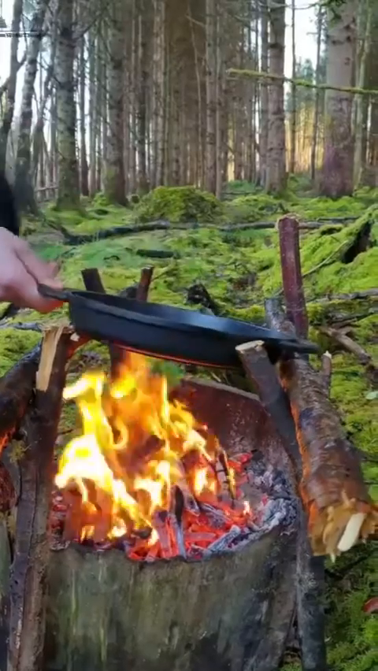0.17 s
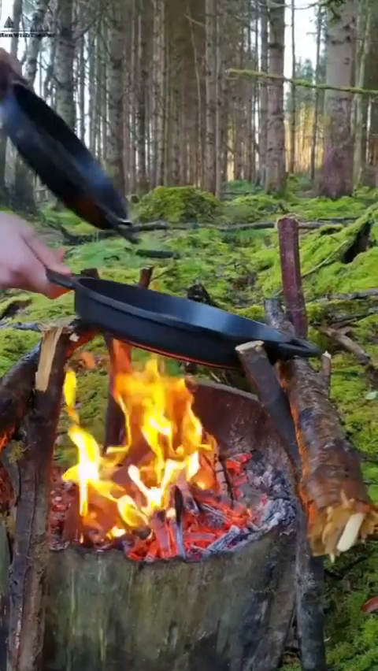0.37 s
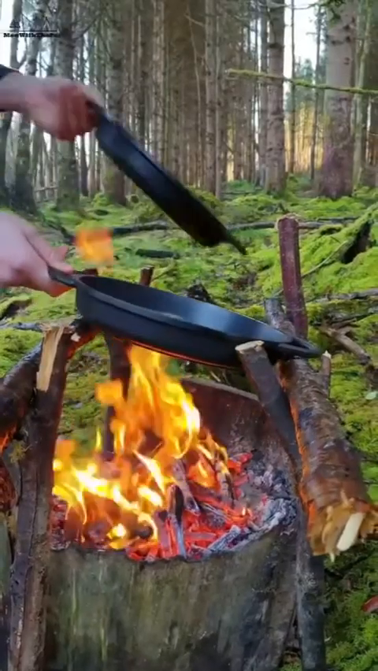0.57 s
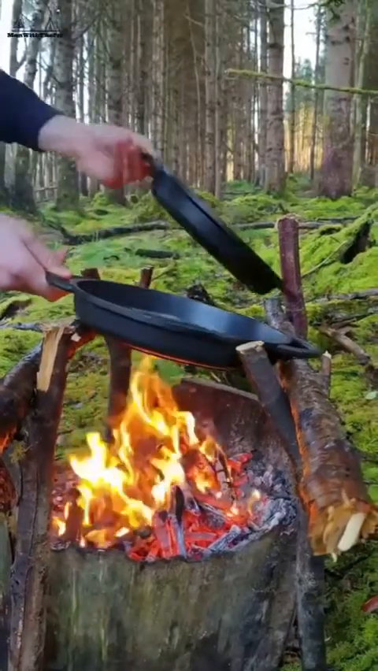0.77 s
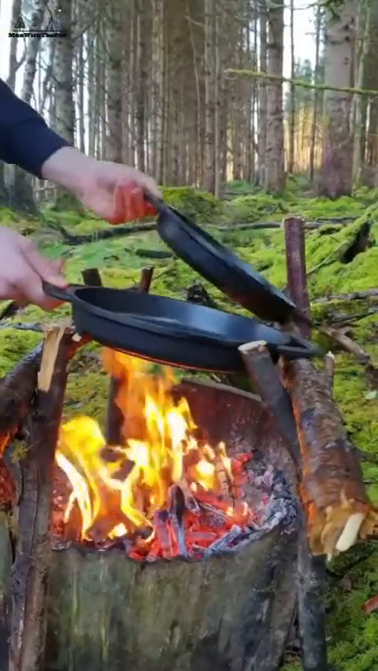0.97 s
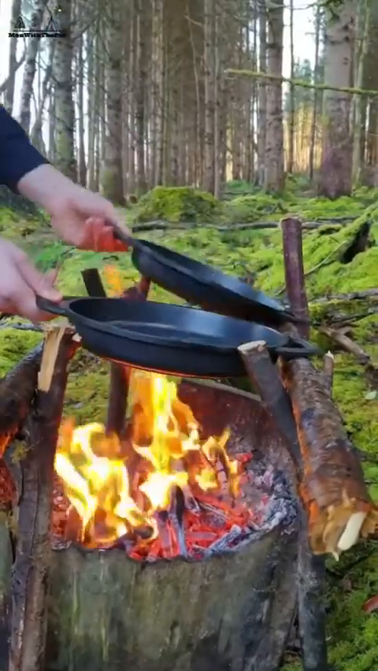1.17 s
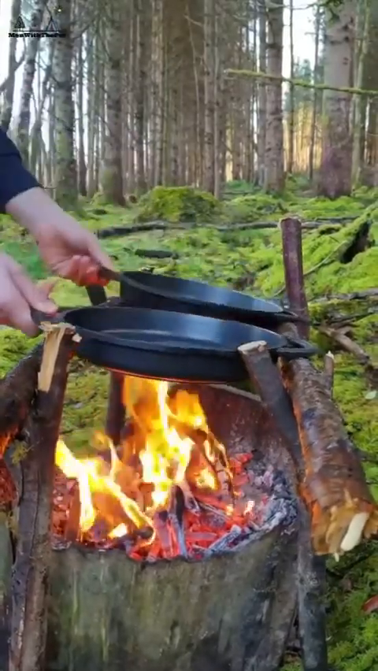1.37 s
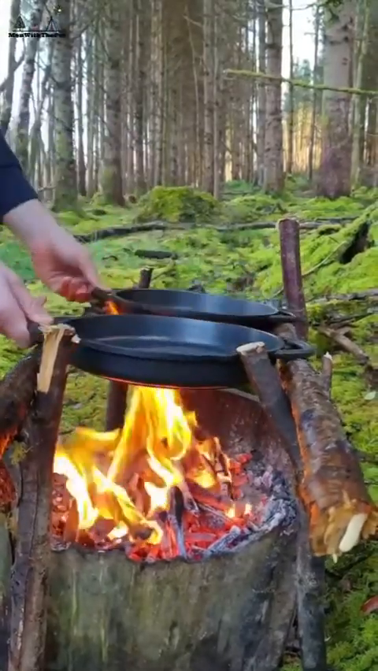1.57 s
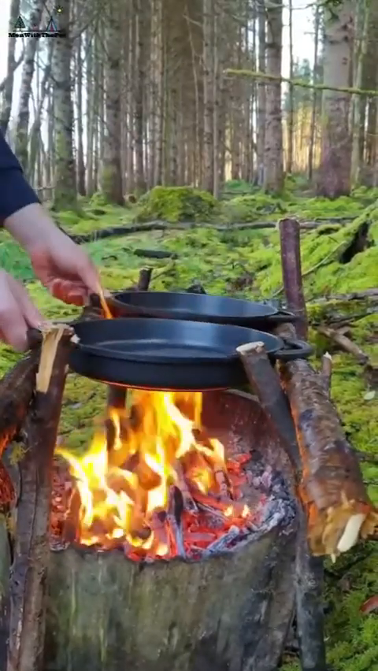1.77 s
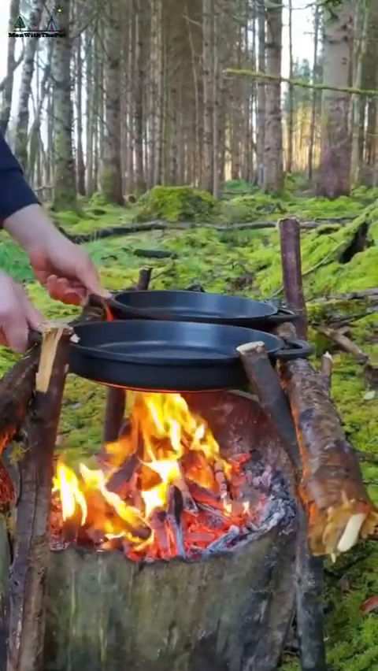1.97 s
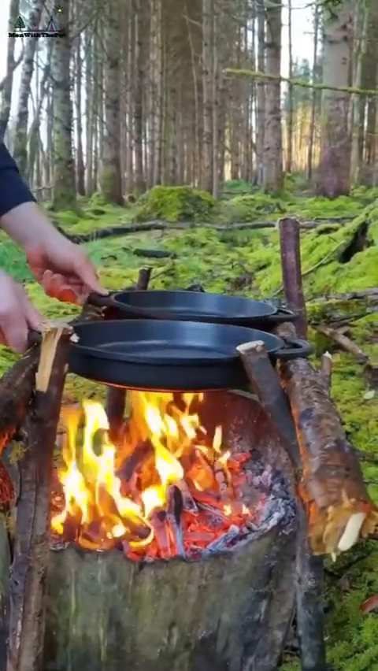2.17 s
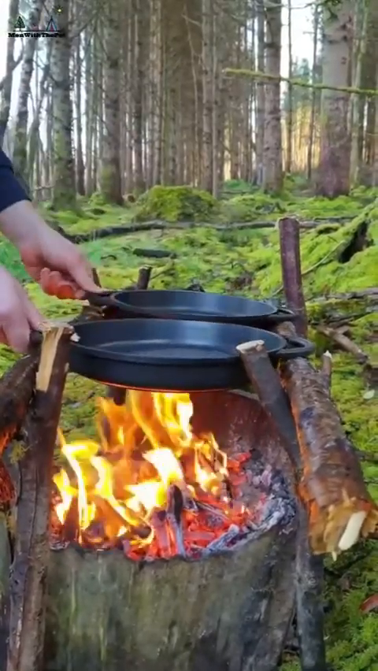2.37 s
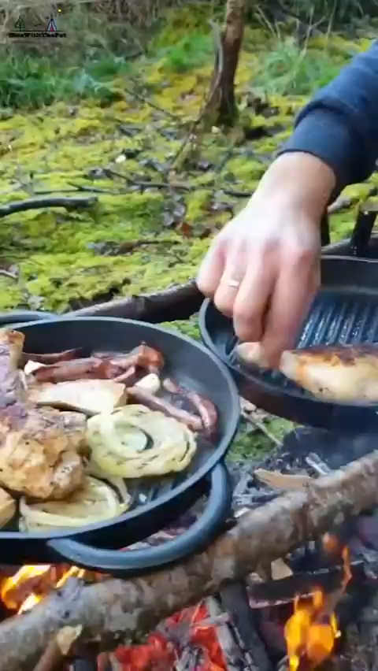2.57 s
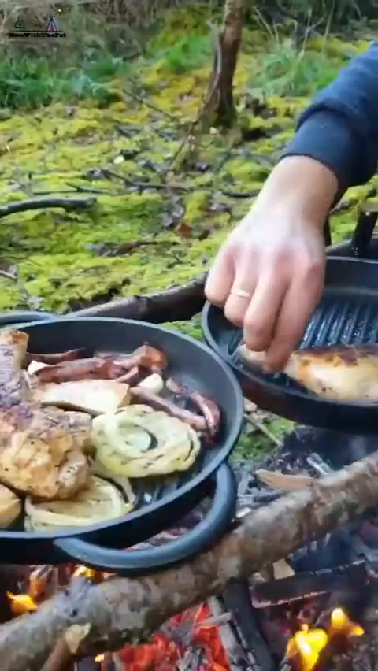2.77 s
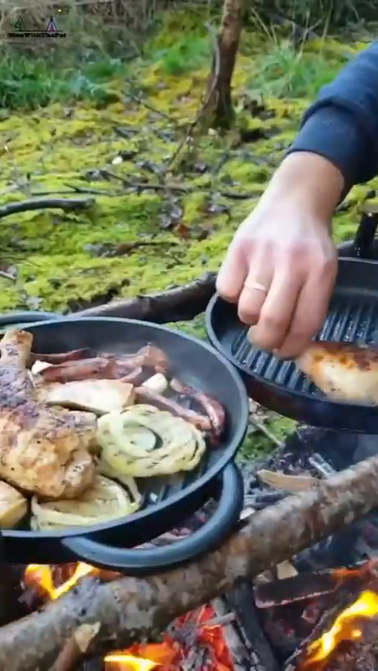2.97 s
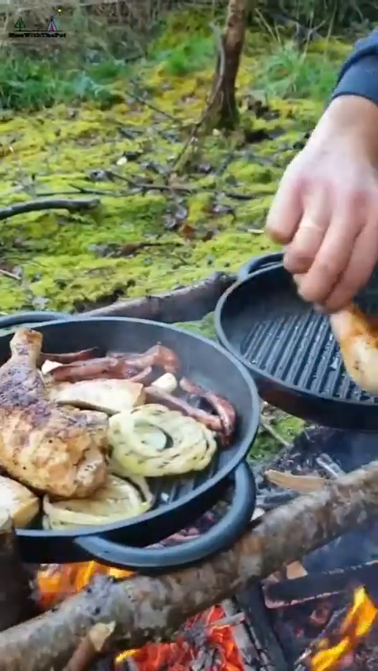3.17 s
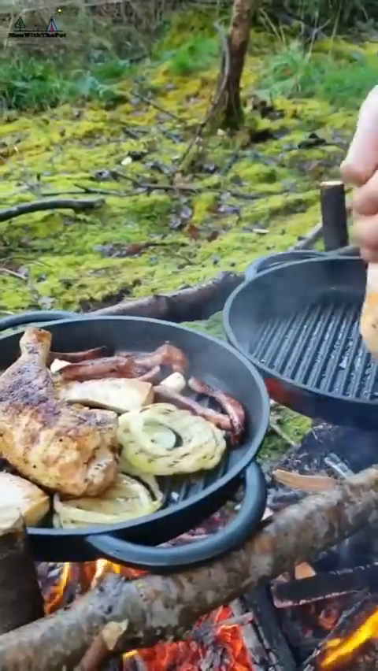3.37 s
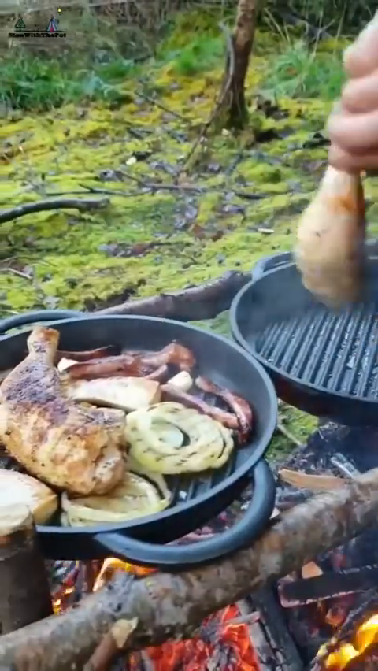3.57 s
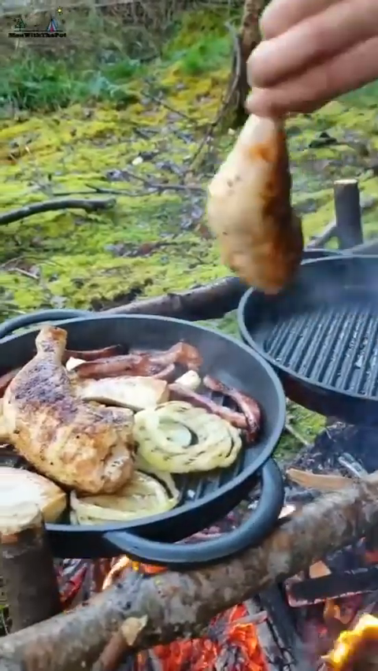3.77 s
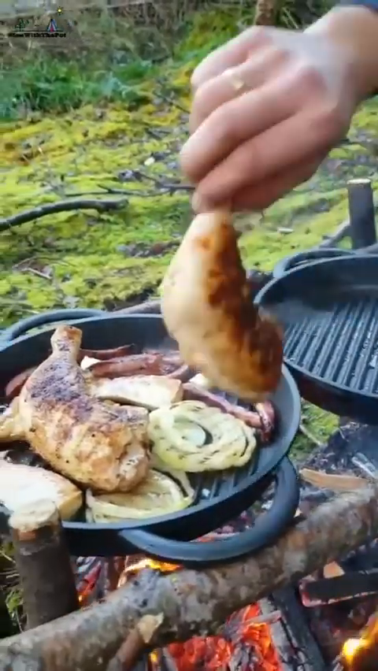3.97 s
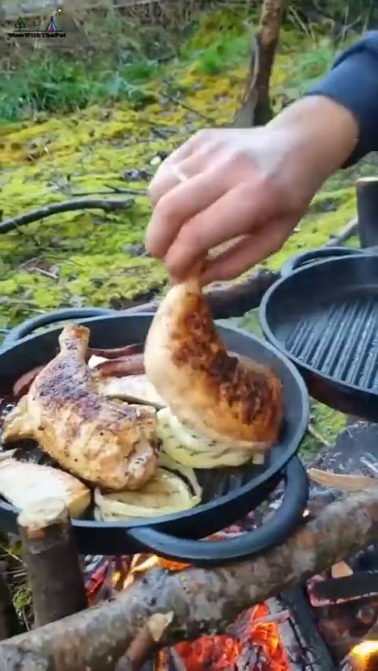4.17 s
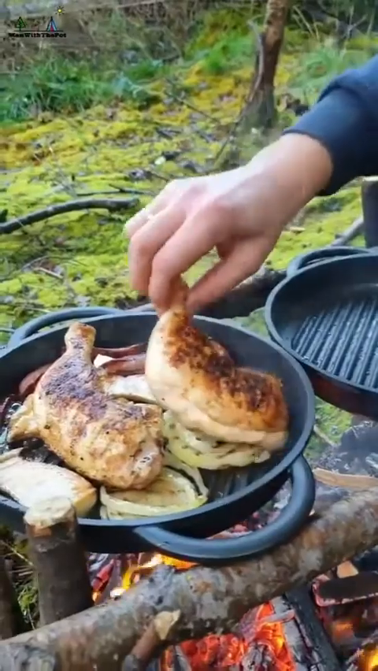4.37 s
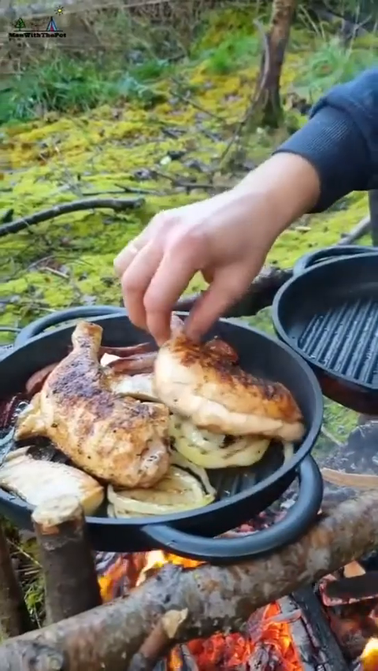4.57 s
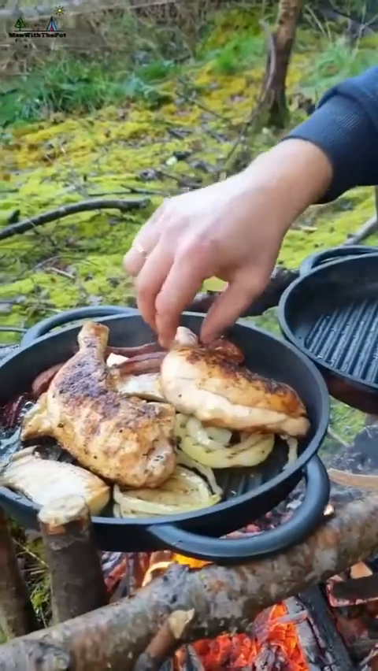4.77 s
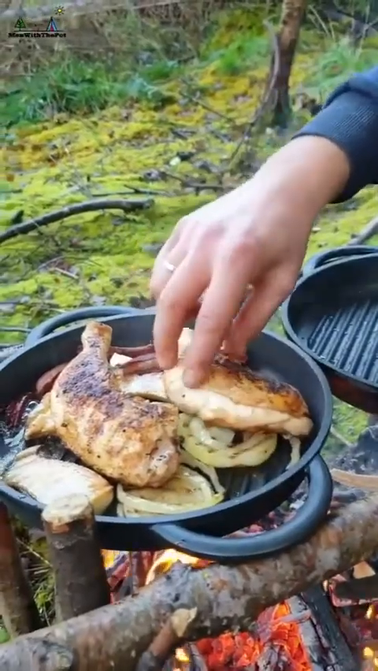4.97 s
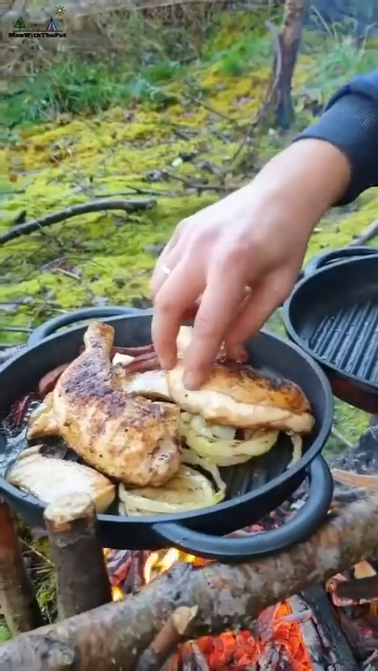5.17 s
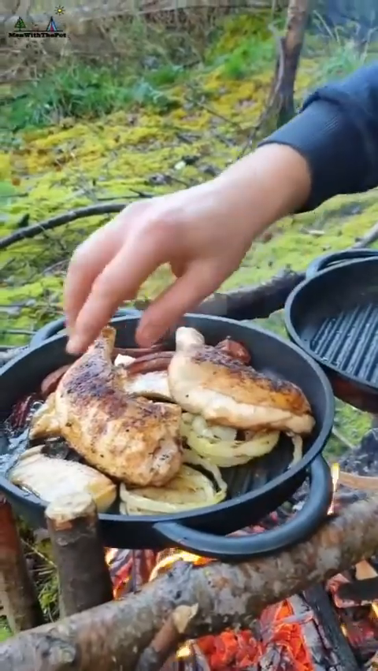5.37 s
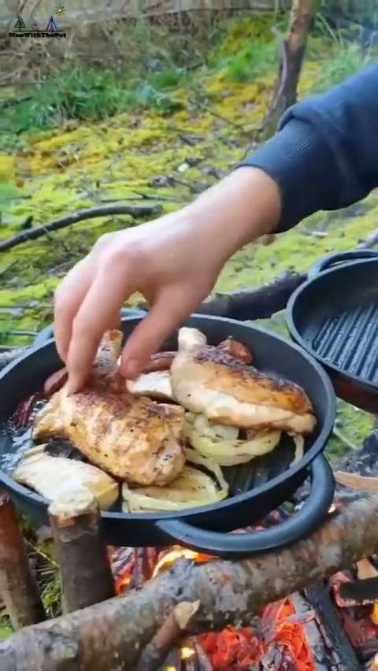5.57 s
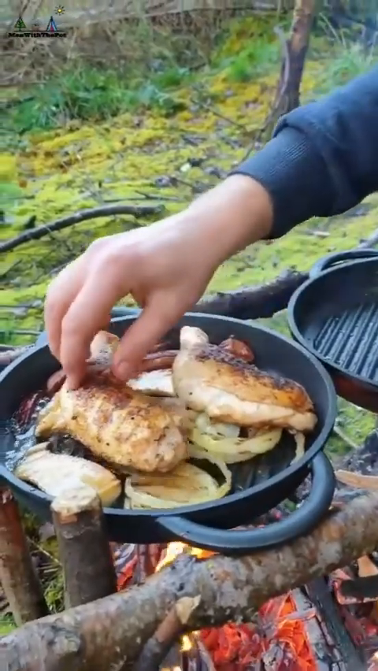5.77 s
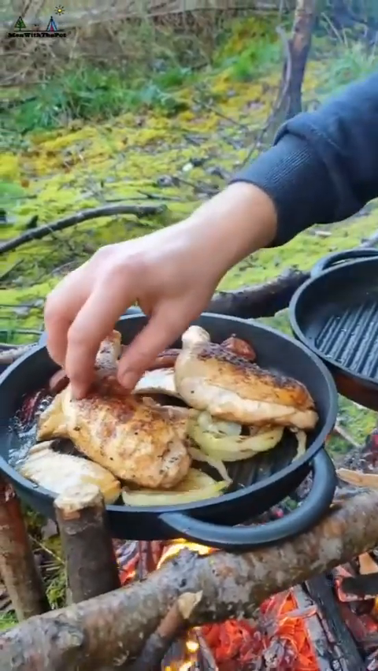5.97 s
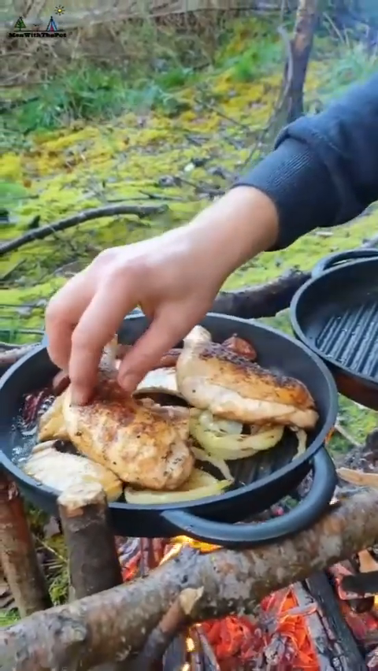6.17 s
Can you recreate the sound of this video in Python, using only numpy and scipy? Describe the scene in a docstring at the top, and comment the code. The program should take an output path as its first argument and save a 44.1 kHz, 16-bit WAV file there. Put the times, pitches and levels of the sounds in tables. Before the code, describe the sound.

Cast-iron pans clank and scrape onto a log rack over a soft wood fire, then chicken sizzles loudly in hot fat up close.

```python
"""Chicken sizzles close up in hot fat: noise puffs for bursting droplets, decaying sines for bubbles and pops,
filtered noise snaps for spits, short hisses and whistles of steam; it swells as meat is laid in and pressed down.
Before that, two cast-iron pans are set on a rack of logs over a wood fire in a forest. Blows and rubs ring
their modes over a noisy thud, the wood snaps, and trunks answer with a faint tail.
The fire goes on throughout: a fluttering low rumble, a soft rush and low sine puffs."""
import sys
import numpy as np
from scipy import signal
from scipy.fft import rfft, irfft, next_fast_len
from scipy.io import wavfile

SR = 44100
rng = np.random.default_rng(int(sys.argv[2]) if len(sys.argv) > 2 else 0)


def digitize_waveform(pressure):
    """Quantize a signal to 16-bit integers and store it at the path in sys.argv[1].

    Rows of a 2-D input are taken as channels; values are limited to [-1, 1].
    """
    field = np.atleast_2d(pressure).T
    bounded = np.clip(field, -1, 1)
    quanta = np.round(bounded * 32767).astype(np.int16)
    wavfile.write(sys.argv[1], SR, quanta)


N = 274285
TIME = np.arange(N) / SR
SIDES = np.array([[1], [-1]])   # left, right
CLOSE_UP_S = 2.795   # from here on the pan is heard from close by
CUTOFF_HZ = 11800   # top of the whole sound
FIRE_WIDE_DB, FIRE_CLOSE_DB = -59.5, -62.5   # rumble drive facing the flames, and from above the pan
FOREST_T60_S, FOREST_PANS_DB, FOREST_WOOD_DB = 0.33, -14.5, -16.5   # tail decay and sends
# the log rack takes the weight of the rear pan
RACK_S, RACK_DB, RACK_HZ, RACK_T60_S = 1.051, -38, 142, 0.07
PLOP_CYCLES, BUBBLE_CYCLES, FIZZ_CYCLES, TICK_CYCLES = 8, 40, 70, 31   # cycles to fall 60 dB
BURST_S, BUBBLE_SPREAD_DB = .0018, 3.0   # decay constant of steam power; inequality of small bubbles
SPIT_T60_S, SPIT_WIDTH = 0.0064, 1.58   # band corners lie this factor below and above the centre
SPATTER_PER_S, SPATTER_DB, SPATTER_SPREAD_DB = 30, -0.5, 3   # lesser spits, level relative to the boil

# stereo likeness of left and right: (frequency [Hz], correlation [-1 to 1])
LIKENESS = [(40, 0.6), (130, 0.9), (230, 0.7), (450, 0.53), (700, 0.8), (1500, .5), (2200, 1), (3500, 0.77),
            (4500, 0.17), (8000, 0), (11000, -0.02)]
# stereo tilt: (frequency [Hz], left over right [dB])
BALANCE = [(50, 0.5), (170, -1), (350, 6.5), (1100, 6), (2100, 1), (3700, -2.5), (5200, 12), (6800, 9),
           (9000, 5.5), (11500, 0.5)]
# colour of the fire: (frequency [Hz], density [dB per Hz])
FIRE_COLOUR = [(20, -26.5), (40, -3), (65, 4), (130, -3.5), (240, -19.5), (420, -17), (600, -22),
               (820, -23.5), (1100, -33), (3000, -38.5), (7300, -47), (10500, -38.5)]
# puffs of flame: (time [s], level before panning [dB], pitch [Hz])
PUFFS = [(0.683, -44.5, 56.3), (1.756, -36.5, 73.3), (2.141, -41, 57.5), (5.006, -37, 67.2)]
# snaps of burning wood: (time [s], level [dB])
SNAPS = [(0.375, -45), (0.7172, -38.5), (1.133, -47), (1.316, -46), (2.289, -30.5)]
# colour of a wood snap: (frequency [Hz], density [dB per Hz])
SNAP_COLOUR = [(200, -28), (700, 1.5), (1400, 4), (3000, 0.5), (6000, -7), (9000, 2), (12000, -2.5)]
# pan modes: (frequency [Hz], level [dB], t60 [s])
FRONT_PAN = [(828, -2, .14), (884, -6, .11), (1733, -3, .16), (1825, -5, .11), (2013, 0, .16),
             (2548, -24, .33), (3036, -21, .21), (926, -16, .1), (1322, -17, .11), (1907, -14, .16),
             (2068, -12, .16), (3418, -20, .12), (4420, -20, .06), (4510, -24, .05), (4867, -28, .11),
             (5140, -25, .05), (6008, -21, .06), (6120, -23, .05), (6218, -24, .08), (7251, -24, .08),
             (7480, -20, .055), (8193, -26, .1), (8850, -25, .07), (9372, -27, .09), (10200, -25, .06),
             (10800, -23, .06)]
REAR_PAN = [(1410, -7, 0.16), (1450, -11, .12), (1693, -4.5, .125), (1765, -3.5, .12), (1790, -8, .14),
            (1911, -6.5, .13), (2065, -7.5, .13), (2095, -5, .11), (2541, -4.5, .26), (2240, -1.5, .03),
            (2340, -6.5, .03), (2487, -20.5, .13), (2850, -18, .08), (3020, -13, .09), (3400, -14, .1),
            (3639, -10.5, .1), (4953, -22.5, .08)]
# dull clatter of iron on logs: (frequency [Hz], density [dB per Hz])
THUD_COLOUR = [(60, -24.5), (140, -7), (280, -13.5), (480, 2.5), (750, -3.5), (1050, -7.5), (1400, -1.5),
               (2100, -31), (2700, -16.5), (3400, -15), (5200, -15), (11000, -3.5)]
# pans sliding as they settle: (time [s], length [s], front pan [dB], rear pan [dB], grit [dB],
# contact brightness [Hz])
RUBS = [(0.894, 0.056, -66.5, -103, -93, 960), (1.045, .045, -63.5, -76, -64, 3000),
        (1.277, 0.13, -66, -90, -90, 1000), (1.401, 0.042, -47, -53, -56, 2300),
        (1.46, .13, -61, -64, -66, 2370), (1.789, 0.044, -66, -64.5, -68.5, 1860),
        (2.026, 0.031, -75, -51, -48.5, 3400), (2.629, 0.074, -77.5, -54.5, -64, 2000)]
# pans meeting logs and each other, often rocking into a second or third touch:
# (time [s], thud drive [dB], front pan drive [dB], rear pan drive [dB], thud brightness [Hz],
# ring brightness [Hz], build-up constant [s])
KNOCKS = [(0.468, -44, -77, -88, 810, 1000, 0.0015), (1.049, -21, -43, -62, 970, 650, 0.0011),
          (1.0611, -33, -43, -69, 900, 604, .002), (1.39, -10.5, -21.5, -52, 3260, 8890, .0008),
          (1.3999, -34, -23.5, -43, 5500, 9000, 0.0016), (1.4088, -33, -33, -43, 3300, 5030, .0008),
          (1.797, -32, -68, -75, 1115, 1900, .003), (1.806, -38, -69, -67, 1610, 1900, 0.0022),
          (2.0246, -25.5, -56, -45, 2210, 3550, .001), (2.0357, -28, -62, -38, 3000, 4200, 0.0004),
          (2.048, -60, -68, -49, 2600, 3800, .0006), (2.425, -35.5, -61, -72, 750, 800, 0.0042),
          (2.635, -34.5, -64.5, -52, 1100, 1840, 0.0022), (2.658, -53, -62, -47.5, 1000, 1600, 0.004),
          (2.67, -32, -72, -50, 280, 1610, 0.0022)]
# colour of the frying: (frequency [Hz], density [dB per Hz])
FRY_COLOUR = [(150, -23), (250, -20), (440, -19.5), (578, -9), (691, -14), (1080, -15.5), (1190, -7),
              (1620, -5), (2350, -2.5), (2850, -3), (4010, -3), (4480, -5.5), (6390, -13), (10400, -2),
              (11800, -10.5), (15300, -104)]
# wet skin touches hot iron and the fat flares: (time [s], level [dB], t60 [s])
FLARES = [(3.321, -33, 0.08), (3.824, -43, 0.08), (4.218, -36, 0.18), (5.0443, -32.5, 0.18),
          (5.108, -35.5, 0.088), (5.127, -34, 0.083), (5.756, -43, 0.11)]
# steam squeezed out from under the pressed meat: (time [s], length [s], level [dB], pitch [Hz])
SQUEALS = [(5.972, 0.069, -42, 2340), (5.975, 0.074, -45, 4010), (6.105, .075, -40, 2340),
           (6.11, 0.075, -44, 4140)]
# large bubbles popping in the fat: (time [s], drive [dB], pitch [Hz], left over right [dB])
POPS = [(2.9796, -21, 2550, 6), (3.2439, -26, 2610, 10), (3.358, -21, 3550, 5), (3.385, -23, 3540, 2),
        (3.3984, -21, 3820, -1), (3.719, -23.5, 2685, -1), (4.131, -19.5, 2660, 4), (4.15, -23, 3380, 0),
        (4.2194, -23.5, 1940, 1), (4.5056, -19.5, 3590, -1), (4.6614, -22.5, 4340, -3),
        (4.8703, -28, 2460, 5), (4.915, -23, 3300, 0), (4.938, -35, 1140, 0), (5.014, -20.5, 2380, -0.5),
        (5.106, -23, 2560, 1), (5.3856, -31, 2060, 4), (5.434, -20, 3800, -2), (5.85, -25, 2520, -2)]
# sharp spits of water in the fat: (time [s], peak before panning [dB], centre [Hz], left over right [dB])
SPITS = [(3.1068, -28, 7900, 12), (3.3258, -18.5, 9200, 10.5), (3.8046, -19, 9600, 2),
         (3.8712, -24.5, 5000, 7), (4.2187, -28, 2950, 1), (4.512, -30, 4500, 7), (4.624, -27.5, 10000, 13),
         (4.8915, -30, 8000, 3), (4.9514, -20.5, 8500, 4), (4.9946, -18.5, 5950, 8), (5.042, -20, 6500, 10),
         (5.129, -21, 7600, 13), (5.282, -31, 4500, 4), (5.342, -25, 6000, 9), (5.387, -31, 1400, 6),
         (5.5215, -24, 8000, 9), (5.5848, -23.5, 9500, 6), (5.8939, -26, 9000, 6.5), (5.9933, -20, 5140, 8)]
# how hard the fat boils, as the meat is moved and pressed down: (time [s], drive [dB])
BOIL = [(2.81, -57.5), (2.95, -40), (3.02, -39.5), (3.08, -43.5), (3.15, -37.5), (3.27, -40.5), (3.31, -45),
        (3.32, -38.5), (3.49, -40.5), (3.78, -42), (3.86, -40.5), (4.08, -43), (4.4, -44), (4.84, -43),
        (4.91, -39), (4.98, -42), (5.14, -36), (5.21, -46), (5.28, -40.5), (5.42, -38.5), (5.7, -40),
        (5.8, -36.5), (5.99, -33), (6.22, -33.5)]
# treble against the rest of the boil: (time [s], gain [dB])
TREBLE = [(2.85, 0.5), (3.15, 0.5), (3.7, -.5), (4.8, 1.5), (5.0, 1.5), (5.2, 3), (5.55, 2), (5.9, 0.5),
          (6.08, -4)]


def from_db(db):
    """Decibels to amplitude."""
    return 10 ** (np.asarray(db) / 20)


def pan(left_db):
    """Left and right gains for a left-over-right difference."""
    return from_db(SIDES * left_db / 2)


def rms_one(x):
    """Scale to rms 1."""
    return x / np.sqrt(np.mean(x ** 2) + 1e-20)


def in_time(rows):
    """A (time, value) curve read at every sample."""
    s, value = np.transpose(rows)
    return np.interp(TIME, s, value)


def at_hz(points, hz):
    """Read a spectrum on a log-frequency axis."""
    known_hz, value = np.transpose(points)
    return np.interp(np.log(hz + 1), np.log(known_hz), value)


def cut(x, hz, kind, order=2):
    """Low- or high-pass."""
    return signal.sosfilt(signal.butter(order, hz, kind, fs=SR, output="sos"), x + 1e-18)


def add(out, s, sound):
    """Mix a short sound in at time s."""
    start = round(s * SR)
    out[..., start:start + sound.shape[-1]] += sound[..., :N - start]


def drift(rate):
    """Random wander of rms 1, with rate knots a second; it leans to the negative."""
    knots = rng.uniform(-1.61, 1, 4096)
    return rms_one(np.interp(TIME * rate, np.arange(len(knots)), knots))


def stereo_noise(colour, envelope=1, least_alike=0):
    """Noise under an envelope, coloured and spread between left and right; overall rms 1."""
    size = next_fast_len(N)
    hz = np.arange(size // 2 + 1) * SR / size
    mid, side = rfft(rng.standard_normal((2, N)) * envelope, size)
    alike = np.clip(at_hz(LIKENESS, hz), least_alike, 1)
    pair = np.sqrt(1 + alike) * mid + SIDES * np.sqrt(1 - alike) * side
    gain = from_db(at_hz(colour, hz)) * pan(at_hz(BALANCE, hz))
    return rms_one(irfft(pair * gain, size)[:, :N])


def grains(per_s, spread_db):
    """Clicks at random moments: many small ones, a few large."""
    happens = rng.random(N) < per_s / SR
    return happens * from_db(spread_db * np.minimum(rng.exponential(1, N), 4.5))


def ring(clicks, hz, t60):
    """A resonator: a unit click sets a decaying sine of starting height 1 ringing."""
    r, w = from_db(-60 / (t60 * SR)), 2 * np.pi * hz / SR
    return signal.lfilter([0, np.sin(w)], [1, -2 * r * np.cos(w), r * r], clicks + 1e-18)


def forest(x, arrival_s=0.012, low_hz=500, high_hz=2600):
    """Trunks scatter back a faint, dull tail: decaying noise that builds up before it dies."""
    t = TIME[:SR]
    echoes = cut(rng.standard_normal((2, SR)), low_hz, "high")
    echoes = echoes * from_db(-60 * t / FOREST_T60_S) * (1 - np.exp(-(t / arrival_s) ** 2))
    tail = cut(rms_one(echoes), high_hz, "low") / np.sqrt(SR)
    return signal.fftconvolve(x, tail, axes=1)[:, :N]


def flames(air_db=-60, flutter_db=5.0, split_hz=220, puff_s=0.011, puff_phase=0.92, puff_left_db=7):
    """A fluttering rumble under a nearly steady soft rush; pockets of gas flare with a low puff."""
    rumble_db = np.where(TIME < CLOSE_UP_S, FIRE_WIDE_DB, FIRE_CLOSE_DB)
    rumble = cut(stereo_noise(FIRE_COLOUR), split_hz, "low") * from_db(rumble_db + flutter_db * drift(18))
    rush = cut(stereo_noise(FIRE_COLOUR), split_hz, "high") * from_db(air_db + 0.5 * drift(1.8))
    puffs, t = np.zeros((2, N)), TIME[:SR // 4]
    for s, db, hz in PUFFS:
        swell = from_db(db) * (t / puff_s) ** 2 * np.exp(2 - 2 * t / puff_s)   # tops out at puff_s
        add(puffs, s, swell * np.sin(2 * np.pi * hz * t + puff_phase * SIDES))
    return rumble + rush + puffs * pan(puff_left_db)


def snaps(crack_t60=0.0022, scatter_db=-15, scatter_t60=0.079):
    """Wood splits with a sharp crack that scatters briefly round the fire pit."""
    envelope, t = np.zeros(N), TIME[:SR // 4]
    for s, db in SNAPS:
        crack = from_db(db - 60 * t / crack_t60)
        scatter = from_db(db + scatter_db - 60 * t / scatter_t60)
        add(envelope, s, crack + scatter)
    return envelope * stereo_noise(SNAP_COLOUR)


def rubs(left_db=3.0, grit_low_hz=1300):
    """A sliding rim grates and feeds friction noise into the modes of the pans."""
    out, t = np.zeros((2, N)), TIME[:SR // 2]
    for s, length_s, front_db, rear_db, grit_db, brightness_hz in RUBS:
        pressure = np.sin(np.pi * np.minimum(t / length_s, 1))
        friction = cut(rng.standard_normal(len(t)) * pressure, brightness_hz, "low", order=8)
        sound = from_db(grit_db) * rms_one(cut(friction, grit_low_hz, "high"))
        for modes, level_db in (FRONT_PAN, front_db), (REAR_PAN, rear_db):
            ringing = sum(from_db(db) * ring(friction, hz, t60) for hz, db, t60 in modes)
            sound = sound + from_db(level_db) * rms_one(ringing)
        # a shorter rub carries less energy
        add(out, s, sound * np.sqrt(length_s / t[-1]) * pan(left_db))
    return out


def iron(modes, t, brightness_hz, left_db, phase_spread, order):
    """One blow on a pan: a soft contact leaves high modes quiet; listed neighbours swing in opposite senses."""
    hz, db, t60 = np.transpose(modes)[:, :, None]
    sense = (-1) ** np.arange(len(hz))[:, None]
    softness = np.sqrt(1 + (hz / brightness_hz) ** (2 * order))
    height = sense * from_db(db - 60 * t / t60) / softness
    # the two sides are a little out of step
    swing = np.sin(2 * np.pi * hz * t + phase_spread * sense * SIDES[:, None])
    return (height * swing).sum(axis=1) * pan(left_db)


def knocks(thud_t60=0.052, crack_t60=0.025, split_hz=2000):
    """Each contact builds up into a short crack and a wooden thud and sets the pans ringing."""
    out, t = np.zeros((2, N)), TIME[:SR // 2]
    clatter = stereo_noise(THUD_COLOUR, least_alike=0.69)
    for s, thud_db, front_db, rear_db, wood_hz, iron_hz, build_s in KNOCKS:
        stretch = clatter[:, round(s * SR):][:, :len(t)]
        noise = from_db(thud_db) * cut(stretch, wood_hz, "low", order=3)
        thud = cut(noise, split_hz, "low", order=5) * from_db(-60 * t / thud_t60)
        crack = cut(noise, split_hz, "high", order=5) * from_db(-60 * t / crack_t60)
        front = from_db(front_db) * iron(FRONT_PAN, t, iron_hz, left_db=3.0, phase_spread=0.74, order=2)
        rear = from_db(rear_db) * iron(REAR_PAN, t, iron_hz, left_db=-0.5, phase_spread=0.11, order=4)
        add(out, s, (thud + crack + front + rear) * (1 - np.exp(-t / build_s)))
    add(out, RACK_S, np.sin(2 * np.pi * RACK_HZ * t) * from_db(RACK_DB - 60 * t / RACK_T60_S))
    return out


def flares():
    """Moisture flashes to steam: a sudden hiss that dies quickly."""
    envelope, t = np.zeros(N), TIME[:SR // 4]
    for s, db, t60 in FLARES:
        add(envelope, s, from_db(db - 60 * t / t60))
    return envelope * stereo_noise(FRY_COLOUR)


def squeals(ring_t60=0.018):
    """Steam blown through a narrow gap: noise through two resonators, a rough whistle that swells and fades."""
    out = np.zeros(N)
    for s, length_s, db, hz in SQUEALS:
        breath = rng.standard_normal(SR // 4)
        whistle = ring(ring(breath, hz, ring_t60), hz, ring_t60)[-int(length_s * SR):]
        add(out, s, from_db(db) * rms_one(whistle * np.sqrt(np.hanning(len(whistle)))))
    return out


def pops(tick_db=-5, spray_db=-14, spray_hz=3500, spray_t60=.008, swell_s=.0003):
    """A large bubble bursts: a tick that rings for some cycles and a short bright spray."""
    out, t = np.zeros((2, N)), TIME[:SR // 20]
    mist = rms_one(cut(stereo_noise(FRY_COLOUR), spray_hz, "high", order=1))
    for s, db, hz, left_db in POPS:
        tick = np.sin(2 * np.pi * hz * t) * from_db(tick_db - 60 * t * hz / TICK_CYCLES)
        spray = mist[:, round(s * SR):][:, :len(t)] * from_db(spray_db - 60 * t / spray_t60)
        add(out, s, from_db(db) * pan(left_db) * (tick + spray) * (1 - np.exp(-t / swell_s)))
    return out


def spit(hz, left_db, apart=1.0):
    """A drop of water explodes in the fat: one sharp, broad snap of peak 1 before panning."""
    t = TIME[:SR // 50]
    shared, own = rng.standard_normal(len(t)), rng.standard_normal((2, len(t)))
    burst = (shared + apart * own) * from_db(-60 * t / SPIT_T60_S)
    snap = cut(burst, hz / SPIT_WIDTH, "high")
    snap = cut(snap, min(hz * SPIT_WIDTH, CUTOFF_HZ), "low", order=4)
    return snap / abs(snap).max() * pan(left_db)


def spits(low_hz=1400, high_hz=9000, left_db=3, scatter_db=4):
    """Placed spits, and a random spatter of lesser ones whose level follows the boil."""
    out, boil_db = np.zeros((2, N)), in_time(BOIL)
    for s, db, hz, side_db in SPITS:
        add(out, s, from_db(db) * spit(hz, side_db))
    close_s = TIME[-1] - CLOSE_UP_S
    for when, pitch, strength, place in rng.random((int(SPATTER_PER_S * close_s), 4)):
        s = CLOSE_UP_S + when * close_s
        size = min(-np.log(1 - strength), np.log(30))   # many small, a few large
        db = boil_db[int(s * SR)] + SPATTER_DB + SPATTER_SPREAD_DB * size
        hz = low_hz * (high_hz / low_hz) ** pitch
        add(out, s, from_db(db) * spit(hz, left_db + scatter_db * (2 * place - 1)))
    return out


def crackle(per_s, spread_db, burst_s, hiss):
    """Droplets burst in the fat, each a tiny puff of steam; the smallest merge into a hiss."""
    clicks = grains(per_s * from_db(5.7 * drift(45)), spread_db)   # the rate wanders
    power = signal.lfilter([1], [1, -np.exp(-1 / (burst_s * SR))], clicks ** 2 + 1e-18)
    return stereo_noise(FRY_COLOUR, np.sqrt(power / power.mean() + hiss))


def bubbles(per_s, spread_db, low_hz, high_hz, cycles, phase_spread):
    """Bubbles ring for some cycles, each at its own pitch and from its own place in the pan; rms 1."""
    out = np.zeros((2, N))
    for when, pitch, strength, place in rng.random((int(per_s * N / SR), 4)):
        hz = low_hz * (high_hz / low_hz) ** pitch
        t = TIME[:int(SR * cycles / hz)]
        rarity = min(-np.log(1 - strength), np.log(30))   # a positive spread makes the rare ones loud
        height = from_db(spread_db * rarity - 60 * t * hz / cycles) * pan(at_hz(BALANCE, hz))
        phase = SIDES * phase_spread * (2 * place - 1)   # place is heard as a left-right phase shift
        add(out, when * TIME[-1], height * np.sin(2 * np.pi * hz * t + phase))
    return rms_one(cut(out, 1.22 * low_hz, "high"))


def shifting_colour(x, copy_db=-4, first_s=0.000702, last_s=0.005, sway_s=0.00012, per_s=9, count=7):
    """A few copies at random, swaying delays are mixed in, so narrow bands of the hiss rise and fall."""
    out = x.copy()
    for delay_s in rng.uniform(first_s, last_s, count):
        sent = TIME - delay_s - sway_s * drift(4)
        delayed = np.array([np.interp(sent, TIME, side) for side in x])
        out += delayed * drift(per_s) * from_db(copy_db) / np.sqrt(count)
    return out / np.sqrt(1 + from_db(copy_db) ** 2)


def sizzle(split_hz=4700, body_db=-4, fine_db=0.07, bubble_db=-6.5, plop_db=-20, fizz_db=-7,
           sputter_db=1.47, surge_db=0.64):
    """Crackle and bubbles follow the boil; it surges as a whole, while small bubbles and treble sputter apart."""
    boil = from_db(in_time(BOIL) + surge_db * drift(30)) * (TIME > CLOSE_UP_S)
    body = crackle(per_s=600, spread_db=3.0, burst_s=BURST_S, hiss=0.47)
    body = from_db(body_db) * cut(body, split_hz, "low", order=3)
    fine = crackle(per_s=980, spread_db=4.0, burst_s=0.0013, hiss=0.73)
    fine = from_db(fine_db) * cut(fine, split_hz, "high", order=3)
    large = bubbles(per_s=120, spread_db=2.5, low_hz=758, high_hz=2100, cycles=PLOP_CYCLES,
                    phase_spread=0.93)
    small = bubbles(per_s=450, spread_db=BUBBLE_SPREAD_DB, low_hz=1940, high_hz=4375,
                    cycles=BUBBLE_CYCLES, phase_spread=0.05)
    tiny = bubbles(per_s=890, spread_db=-2.0, low_hz=5970, high_hz=11930, cycles=FIZZ_CYCLES,
                   phase_spread=2.04)
    bubbling = body + from_db(bubble_db + sputter_db * drift(25)) * small + from_db(plop_db) * large
    treble = from_db(in_time(TREBLE) + sputter_db * drift(25))
    fizzing = treble * (fine + from_db(fizz_db) * tiny)
    return shifting_colour(boil * (bubbling + fizzing))


def scene():
    """Pans and fire in the open forest, then the frying close by."""
    pans, wood = knocks() + rubs(), snaps()
    tail = forest(from_db(FOREST_PANS_DB) * pans + from_db(FOREST_WOOD_DB) * wood)
    frying = sizzle() + pops() + spits() + flares() + squeals()
    return pans + wood + tail + flames() + frying


def record(dry):
    """The top is cut steeply."""
    return signal.sosfilt(signal.ellip(10, .2, 70, CUTOFF_HZ, fs=SR, output="sos"), dry)


dry = scene()
out = record(dry)
digitize_waveform(out)
```